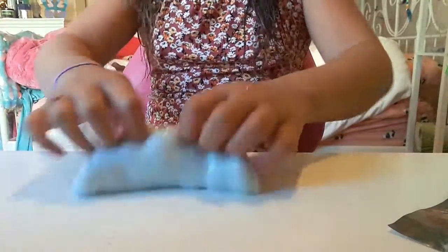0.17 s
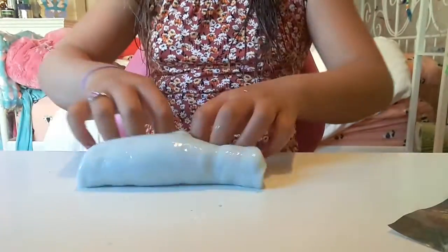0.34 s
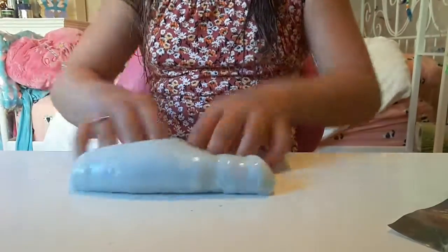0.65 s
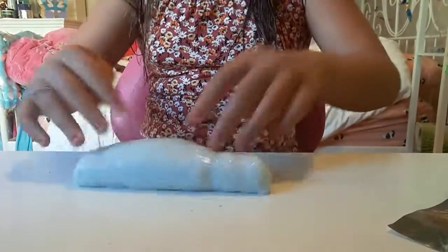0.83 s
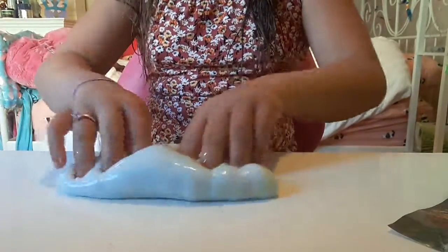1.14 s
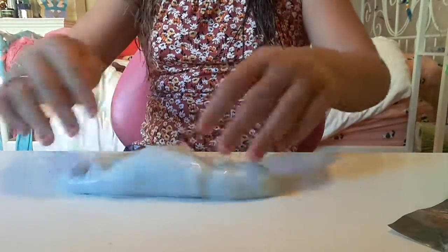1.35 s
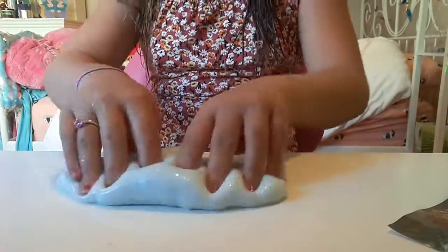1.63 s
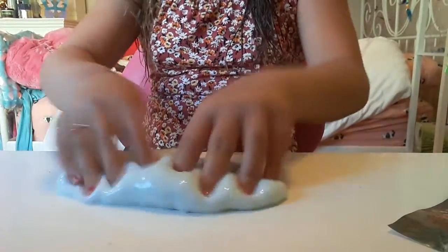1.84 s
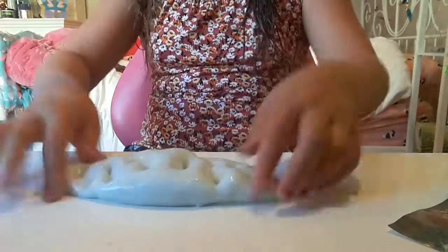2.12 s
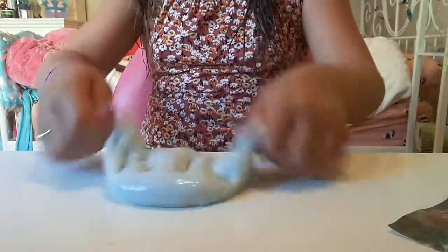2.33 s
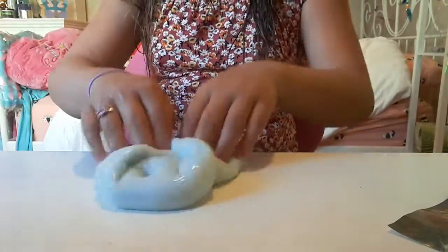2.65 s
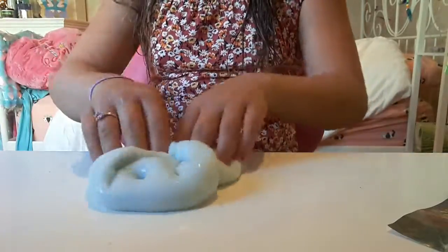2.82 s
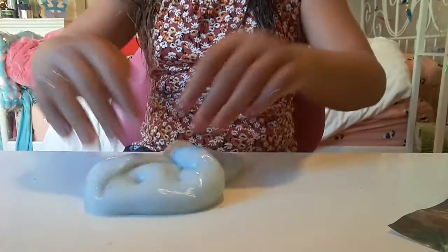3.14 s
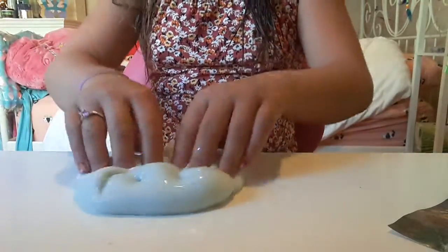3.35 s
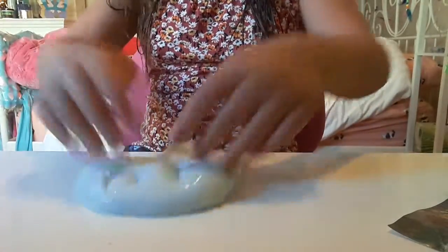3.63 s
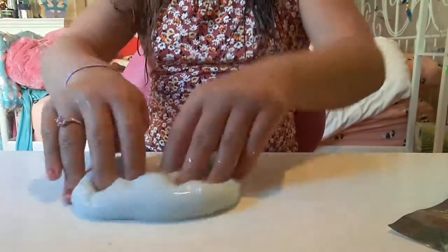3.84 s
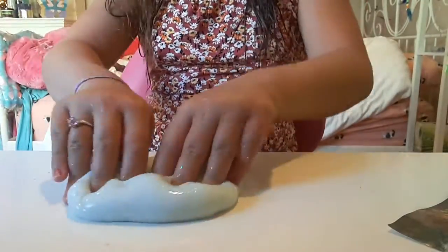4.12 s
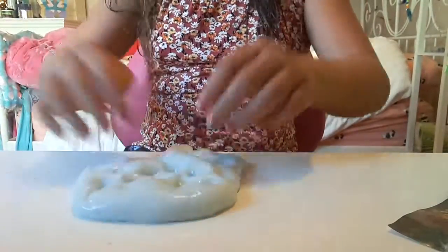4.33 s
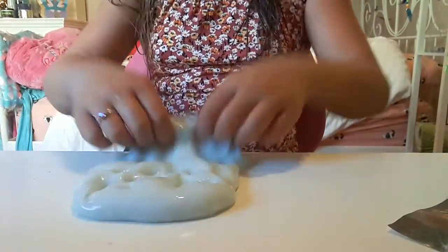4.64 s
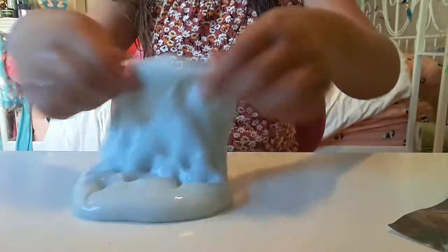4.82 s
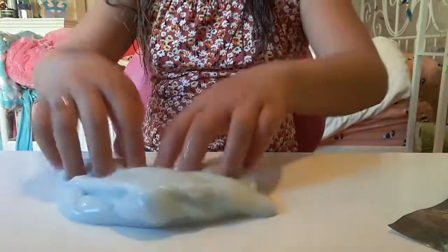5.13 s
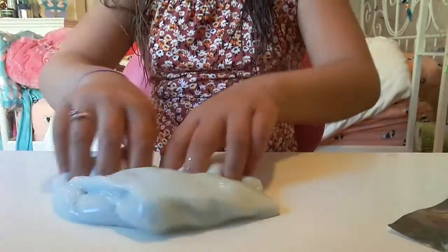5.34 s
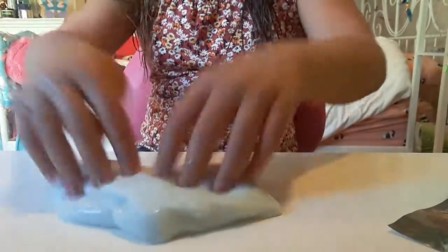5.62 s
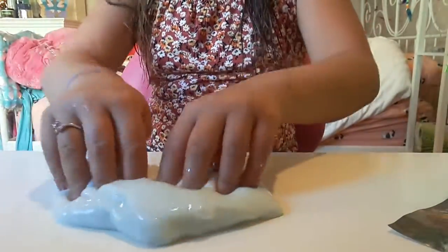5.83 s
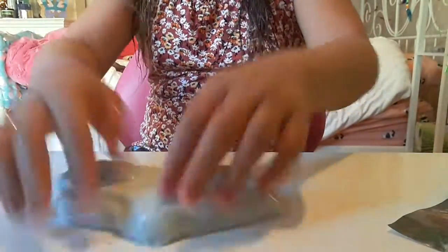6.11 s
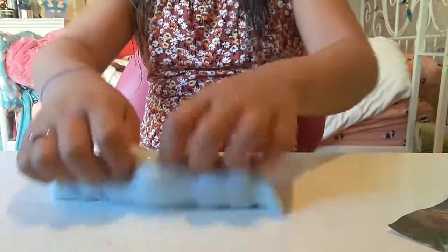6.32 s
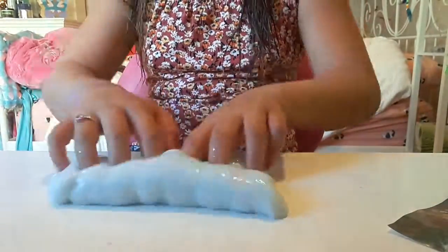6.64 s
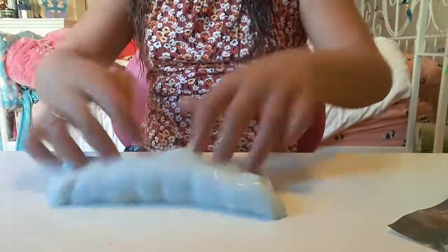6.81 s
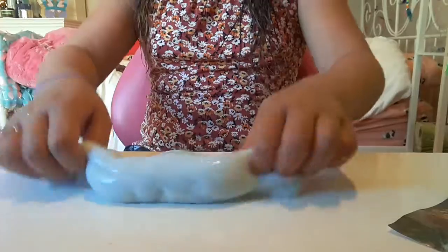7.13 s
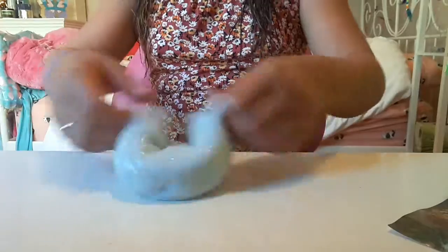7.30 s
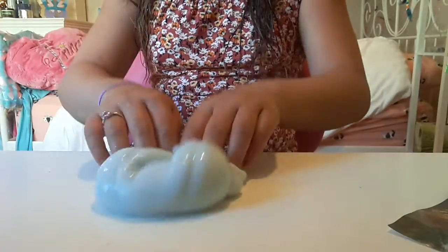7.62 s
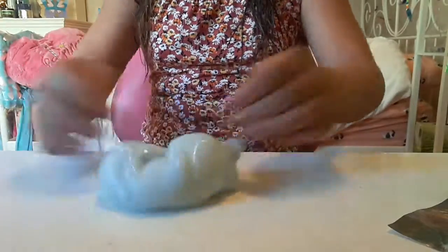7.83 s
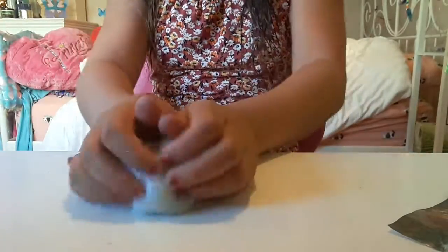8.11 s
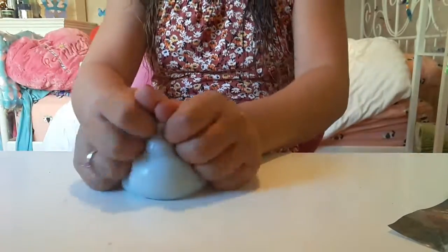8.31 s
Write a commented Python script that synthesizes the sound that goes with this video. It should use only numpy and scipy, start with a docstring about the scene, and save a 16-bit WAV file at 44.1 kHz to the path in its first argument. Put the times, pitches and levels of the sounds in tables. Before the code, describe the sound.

Fingertips poke thick wet slime on a table in quick triple clicks and hollow pops, with squelchy folds and soft thuds in a quiet room.

```python
"""Fingertips poke, fold and squeeze thick wet slime on a table in a small quiet room.
Each poke lands three fingertips: each thuds on the table, pops a trapped air pocket and snaps the wet skin.
Around the pokes the slime crackles, ticks and blips; flat hands press it with soft thuds.
Breaks are noise bursts through colour filters, and cavities are damped gliding sines.
The table top rings on, close reflections and a room tail answer, over a low background noise."""
import sys
import numpy as np
from scipy import signal
from scipy.fft import rfft, irfft, next_fast_len
from scipy.io import wavfile
from scipy.ndimage import uniform_filter1d

SR = 44100
rng = np.random.default_rng(int(sys.argv[2]) if len(sys.argv) > 2 else 0)


def transcribe(signal):
    """Save signal, clipped to [-1, 1], as a 16-bit WAV file at the path in sys.argv[1]."""
    frames = np.atleast_2d(signal).T
    limited = np.clip(frames, -1, 1)
    pcm = np.round(limited * 32767).astype(np.int16)
    wavfile.write(sys.argv[1], SR, pcm)


N = 373086  # length of the scene [samples]
BURST_T = np.arange(3072) / SR  # time axis of every single burst [s]

# Place: background noise of the quiet room: (frequency [Hz], relative level [dB])
QUIET_COLOUR = [(20, -27), (38, -24), (51, 6.5), (75, -6), (115, -3), (230, -5), (410, -9), (700, -19.5),
                (1500, -24.5), (5300, -40), (8000, -22.5), (10500, -44), (16000, -44)]
QUIET_DB = -60.5
# Place: reverberation time of the room: (frequency [Hz], time to fall 60 dB [s])
ROOM_T60 = [(200, 0.68), (1000, 0.37), (8000, 0.38)]
# Place: colour of the room's tail: (frequency [Hz], level [dB])
ROOM_COLOUR = [(200, -12), (600, -10), (6000, -5)]
# Modes of the table top: (frequency [Hz], relative level [dB], time to fall 60 dB [s])
TABLE_MODES = [(105.4, 0, 0.23), (123.6, -0.5, 0.26), (223.3, 4.5, 0.14), (473, -1, 0.17),
               (616.5, 13, 0.092), (666, 10, 0.19)]
# Microphone side: upper band limit of the recorder
RECORDER_EDGE_HZ = 16200

# Hands lean on the table and it sways: (time [s], level [dB])
LEANS = [(3.859, -42.5), (4.41, -47), (4.931, -44.5), (5.47, -49), (5.96, -51), (6.22, -60)]
LEAN_RISE_S, LEAN_DB_PER_S = 0.022, -114

# Colour of the skin's snap: (frequency [Hz], relative level [dB])
SNAP_COLOUR = [(100, -50.5), (1500, -16), (3700, -14.5), (5600, -14), (7000, -5.5), (8100, 2), (9000, -5),
               (11000, -17), (16000, -29.5)]
# Colour of an air pocket's splat: (frequency [Hz], relative level [dB])
POP_COLOUR = [(100, -36.5), (400, 2.5), (650, -0.5), (1800, -1), (2200, -13), (2800, -11.5), (3700, -27.5),
              (8000, -22), (16000, -57.5)]
# Colour of a cushioned landing: (frequency [Hz], relative level [dB])
THUD_COLOUR = [(25, -24.5), (70, -15), (115, 1), (230, 3.5), (320, -7), (500, -9), (1000, -30), (5000, -50)]
# Colour of a small bubble's tear: (frequency [Hz], relative level [dB])
TEAR_COLOUR = [(80, -10.5), (400, 11), (2600, -1), (3800, -6.5), (6000, -7), (8100, 7.5), (11000, -16),
               (16000, -35)]

# Faint bubbles part at random: lowest level, random range above it, middle pitch
STRAY_DB, STRAY_SPREAD_DB, STRAY_HZ = -68, 11.5, 4020
# Stretches and folds, each a run of crackle that dies down:
# (start [s], length [s], level of a small blip [dB], middle pitch [Hz])
STRETCHES = [(2.246, 0.12, -48, 2200), (4.652, 0.093, -54, 5000), (4.967, 0.089, -52.5, 3410),
             (6.24, 0.46, -58.5, 3000), (7.12, .2, -51.5, 6500), (7.523, 0.2, -59, 6500),
             (8.059, 1, -51.5, 2600)]
BLIPS_PER_S, STRETCH_FADE_DB, BLIP_SPREAD_DB, BLIP_OCTAVES = 110, -9, 5, 0.95
# The loudest small bubbles and threads parting: (time [s], level [dB], pitch [Hz])
TICKS = [(0.2224, -49, 9650), (0.611, -48, 1860), (0.6304, -39, 8350), (0.9991, -36.5, 1460),
         (2.374, -41, 8270), (2.475, -50.5, 5000), (2.496, -47.5, 3180), (2.808, -49, 7000),
         (4.6977, -46, 7300), (4.9796, -41.5, 4770), (5.702, -37.5, 9440), (6.339, -40.5, 4900),
         (6.485, -43.5, 1870), (7.1915, -36.5, 7480), (7.239, -39, 8400), (7.262, -48, 7000),
         (7.3189, -42.5, 5400), (7.401, -27, 6070), (7.602, -42, 8400), (7.6316, -37, 6760),
         (8.1099, -30.5, 2250), (8.136, -34, 1940), (8.179, -39, 2800), (8.3662, -31, 8000),
         (8.395, -30, 2690)]
# Bubbles squeezed out, from hollow blobs to very short high clicks:
# (time [s], level [dB], middle pitch [Hz], decay [s])
SQUEEZED = [(0.0512, -36, 7740, 0.00095), (2.0901, -24.5, 699, 0.0045), (2.5475, -36.5, 7760, 0.0014),
            (7.398, -34, 1605, 0.0013), (7.4026, -18, 7800, 0.00042), (7.862, -22, 1375, 0.0036),
            (8.212, -20, 2580, 0.00037), (8.212, -23, 4270, 0.00051)]
# Further air pockets that burst during pokes, presses and folds:
# (time [s], level [dB], cavity pitch [Hz])
POCKETS = [(0.337, -53.5, 1510), (0.412, -52.5, 1700), (1.971, -23.5, 795), (2.033, -32, 726),
           (2.272, -37, 664), (4.959, -35, 900), (4.985, -41, 1080), (7.398, -34.5, 1300),
           (8.264, -37, 624), (8.34, -34, 553)]
# Hands pressing or folding the slime onto the table:
# (time [s], thud level before gain [dB], thud pitch [Hz], wet tick level [dB])
PRESSES = [(0.307, -46.5, 240, -70), (0.41, -46, 247, -58), (2.2, -38, 155, -42.5),
           (2.271, -33.5, 236, -32), (4.53, -43, 143, -56), (4.955, -38, 214, -58),
           (6.236, -31.5, 118, -37), (6.255, -30.5, 125, -39.5), (6.645, -30.5, 148, -51),
           (7.115, -35.5, 139, -46.5), (7.161, -35.5, 171, -36.5), (7.566, -39, 158, -39),
           (8.042, -23.5, 168, -34), (8.341, -31, 222, -28.5)]
PRESS_TICK_HZ = 7200

# Pokes of three fingertips; snap and pop grow or shrink by a step from one to the next:
# (time [s], delay of the second [s], delay of the third [s], base snap level [dB], snap step [dB],
#  base pop level [dB], pop step [dB], base cavity pitch [Hz], base thud level [dB], base thud pitch [Hz])
POKES = [(0.7787, .0175, 0.032, -31, -2.5, -29, -3.5, 860, -30, 237),
         (1.3403, .017, .028, -29.5, -0.5, -25, 6, 695, -25, 154),
         (1.9425, 0.013, 0.042, -26, -1.5, -24.5, 8.5, 1100, -27.5, 225),
         (3.0596, 0.013, 0.031, -33, 11, -28, 6, 826, -27.5, 170),
         (3.674, 0.026, 0.061, -27.5, -1, -28.5, -2, 1500, -33.5, 205),
         (4.262, .015, 0.033, -32.5, 9.5, -23.5, 4.5, 960, -27, 282),
         (5.502, 0.03, .0415, -28, 1, -27, 1, 1030, -33.5, 187),
         (6.0246, .024, 0.035, -29.5, 5, -28.5, 10.5, 678, -29, 218),
         (6.8712, 0.016, 0.03, -30, 4.5, -28, -0.5, 820, -32, 215),
         (7.8377, 0.022, .042, -33.5, -10, -31, 11.5, 1150, -28.5, 210)]
# What the first, second and third fingertip add to any poke:
# (snap [dB], snap body [dB], pop [dB], thud [dB], cavity pitch [ratio], thud pitch [ratio])
FINGERS = [(3.5, -4, 0.5, 0, 0.58, 1.08), (5, 6, 0.5, -3.5, 1.3, .97), (-2.5, 7, -3, -3.5, 1.25, .92)]
# A fingertip touches the surface softly just before it breaks through; level relative to the first pop
TOUCH_LEAD_S, TOUCH_DB, TOUCH_HZ = 0.0039, -18.5, 520
# Smaller pockets burst around the sinking fingers; levels relative to the poke's base levels
SPATTER_S, SPATTER_SNAP_DB, SPATTER_POP_DB = 0.045, -11.5, -10.5
SPATTER_HZ, SPATTER_OCTAVES = 705, 0.74


def amp(db):
    """Decibels to gain."""
    return 10 ** (np.asarray(db) / 20)


def read(points, hz):
    """A spectrum table read on a log-frequency axis."""
    f, value = np.transpose(points)
    return np.interp(np.log(hz + 1), np.log(f + 1), value)


def unit(x):
    """Scales a sound to energy one."""
    return x / np.sqrt(np.sum(x ** 2) + 1e-20)


def peaked(x, size):
    """Scales a sound so that its loudest stretch of size samples has rms one."""
    return x / np.sqrt(uniform_filter1d(x ** 2, size, mode="constant").max())


def add(mix, s, sound):
    """Mixes a sound in at time s, in seconds."""
    part = mix[max(round(s * SR), 0):][:len(sound)]
    part += sound[:len(part)]


def coloured(x, colour, hz=1000, focus_db=0, octaves=1, body_db=0):
    """Causal filter: a colour, a resonance at hz, and more or less body below the treble."""
    f = abs(np.fft.fftfreq(len(BURST_T), 1 / SR)) + 1
    focus = focus_db / (1 + (np.log2(f / hz) / octaves) ** 2)
    body = body_db / (1 + (f / 5000) ** 5)
    log_gain = np.log(amp(read(colour, f) + focus + body))
    # minimum phase: the energy comes as early as the colour allows
    kernel = np.fft.ifft(np.exp(np.conj(signal.hilbert(log_gain)))).real
    return signal.fftconvolve(x, kernel)[:len(x)]


def noise(colour):
    """Steady noise of rms one."""
    size = next_fast_len(N)
    gain = amp(read(colour, np.fft.rfftfreq(size, 1 / SR)))
    x = irfft(rfft(rng.standard_normal(size)) * gain, size)
    return unit(x[:N]) * np.sqrt(N)


def background():
    """The steady noise of the quiet room."""
    return amp(QUIET_DB) * noise(QUIET_COLOUR)


def echoes(wet_db, near_db, near_decay=0.005):
    """Close reflections from table and hands, then the short tail of the room."""
    t = np.arange(SR // 2) / SR
    sparse = rng.standard_normal(len(t)) * (rng.random(len(t)) < 0.05)
    near = unit(sparse * (t > 0.0015) * np.exp(-t / near_decay))
    taps = rng.standard_normal(len(t)) * (1 - np.exp(-(t / 0.013) ** 2))
    # each frequency band dies at its own rate
    hz, at, bands = signal.stft(taps, SR, nperseg=256)
    bands = bands * amp(-60 * at / read(ROOM_T60, hz)[:, None])
    tail = coloured(unit(signal.istft(bands, SR)[1][:len(t)]), ROOM_COLOUR)
    return amp(wet_db) * tail + amp(near_db) * near


def room(x, wet_db, near_db):
    """Three sets of echoes fade into one another at a steady rate, so the tail stays smooth."""
    angle = 2 * np.pi * 4.3 * np.arange(N) / SR
    out = x.copy()
    for k in range(3):
        share = np.sqrt(2 / 3) * np.cos(angle + np.pi * k / 3)  # the three powers sum to one
        out += signal.oaconvolve(x * share, echoes(wet_db, near_db))[:N]
    return out


def table(x, ring_db=-57):
    """The table top rings on after every blow, as a sum of decaying modes."""
    t = np.arange(SR // 2) / SR
    modes = sum(amp(db - 60 * t / t60) * np.cos(2 * np.pi * hz * t) for hz, db, t60 in TABLE_MODES)
    return x + amp(ring_db) * signal.fftconvolve(x, modes)[:N]


def sway():
    """A low rumble swells and dies each time the hands lean on the table."""
    t, weight = np.arange(N) / SR, np.zeros(N)
    for s, db in LEANS:
        rise = np.clip((t - s) / LEAN_RISE_S, 0, 1)
        weight += rise * amp(db + LEAN_DB_PER_S * np.maximum(t - s - LEAN_RISE_S, 0))
    return weight * noise([(15, -20), (45, 0), (90, -3), (1000, -80)])  # (frequency [Hz], level [dB])


def rupture(decay, spray):
    """One sudden break followed by a dying spray of smaller ones."""
    x = spray * unit(rng.standard_normal(len(BURST_T)) * np.exp(-BURST_T / decay))
    x[0] += 1
    return x


def ring(hz, decay, attack, glide=0):
    """A damped oscillation whose pitch slides around hz as the cavity changes shape."""
    pitch = hz * (1 + glide * (np.tanh(BURST_T / decay) - 0.5))
    turns = np.cumsum(pitch) / SR
    envelope = np.exp(-BURST_T / decay) * (1 - np.exp(-BURST_T / attack))
    return unit(np.sin(2 * np.pi * turns) * envelope)


def tick(db, hz, tone=0.67):
    """A small bubble tears and rings briefly at its own pitch."""
    burst = rupture(decay=0.003, spray=4.6)
    tear = unit(coloured(burst, TEAR_COLOUR, hz, focus_db=8.0, octaves=0.82))
    cavity = ring(hz, decay=4 / hz, attack=0.0003, glide=0.2)
    return amp(db) * peaked(tear + tone * cavity, size=128)


def thud(db, hz, tone=0.37):
    """The slime cushions a landing into a low push with a falling tone."""
    push = unit(coloured(rupture(decay=0.012, spray=2.6), THUD_COLOUR))
    body = ring(hz, decay=0.006, attack=0.023, glide=-0.14)
    return amp(db) * peaked(push + tone * body, size=300)


def pop(db, hz, tone=0.71, decay=0.0079):
    """An air pocket tears open with a splat and its cavity rings for a few cycles."""
    splat = unit(coloured(rupture(decay, spray=2.3), POP_COLOUR, hz, focus_db=3, octaves=1.0))
    cavity = ring(hz, decay=0.0024, attack=0.0008, glide=0.22)
    return amp(db) * peaked(splat + tone * cavity, size=160)


def snap(db, body_db, decay=0.0013):
    """The wet skin breaks with a bright, short crack."""
    crack = coloured(rupture(decay, spray=6.3), SNAP_COLOUR, body_db=body_db)
    return amp(db) * peaked(crack, size=128)


def strays(count=45):
    """Faint bubbles part at random through the whole scene, up to an octave around a middle pitch."""
    out = np.zeros(N)
    for when, size, pitch in rng.random((count, 3)):
        blip = tick(STRAY_DB + STRAY_SPREAD_DB * size, STRAY_HZ * 2 ** (2 * pitch - 1))
        add(out, when * N / SR, blip)
    return out


def crackle(count=200):
    """Fine bubbles part at random while the slime is stretched: many faint blips, a few stronger ones."""
    pitches = np.geomspace(400, 9000, 40)
    blips, out = [tick(0, hz) for hz in pitches], np.zeros(N)
    for start, length, db, middle_hz in STRETCHES:
        gaps, sizes = rng.exponential(1, (2, count))
        pitch = middle_hz * 2 ** (BLIP_OCTAVES * rng.standard_normal(count))
        times = np.cumsum(gaps) / BLIPS_PER_S
        for t, size, hz in zip(times, np.minimum(sizes, 3.5), pitch):
            if t < length:
                gain = amp(db + BLIP_SPREAD_DB * size + STRETCH_FADE_DB * t / length)
                nearest = np.argmin(abs(pitches - hz))
                add(out, start + t, gain * blips[nearest])
    return out


def bubbles():
    """Single small bubbles tick as the slime is handled."""
    out = np.zeros(N)
    for s, db, hz in TICKS:
        add(out, s, tick(db, hz))
    return out


def squeezed(attack=0.00019, glide=0.17):
    """Bubbles squeezed out, from hollow blobs to very short high clicks, each slightly rising in pitch."""
    out = np.zeros(N)
    for s, db, hz, decay in SQUEEZED:
        add(out, s, amp(db) * peaked(ring(hz, decay, attack, glide), size=128))
    return out


def pockets():
    """Further air pockets burst during pokes, presses and folds."""
    out = np.zeros(N)
    for s, db, hz in POCKETS:
        add(out, s, pop(db, hz))
    return out


def presses(thud_gain_db=-1.0):
    """A flat hand gives a thud and only a small wet tick; returns the ticks and the thuds."""
    ticks, thuds = np.zeros((2, N))
    for s, thud_db, hz, tick_db in PRESSES:
        add(ticks, s, tick(tick_db, PRESS_TICK_HZ))
        add(thuds, s, thud(thud_db + thud_gain_db, hz))
    return ticks, thuds


def spatter(count=4):
    """Smaller snaps and pops scattered through each poke; returns the bright and the hollow part."""
    bright, hollow = np.zeros((2, N))
    slot = SPATTER_S / count  # one snap and one pop fall at random inside each slot
    for start, _, _, snap_db, _, pop_db, *_ in POKES:
        for k, (snap_at, pop_at, pitch) in enumerate(rng.random((count, 3))):
            hz = SPATTER_HZ * 2 ** (SPATTER_OCTAVES * (2 * pitch - 1))
            add(bright, start + slot * (k + snap_at), snap(snap_db + SPATTER_SNAP_DB, body_db=-8.5))
            add(hollow, start + slot * (k + pop_at), pop(pop_db + SPATTER_POP_DB, hz))
    return bright, hollow


def pokes(snap_gain_db=1.0, thud_gain_db=-2.0):
    """Every fingertip snaps skin, bursts a pocket and thuds; returns the bright and the hollow part."""
    bright, hollow = np.zeros((2, N))
    for start, second, third, snap_db, snap_step, pop_db, pop_step, hz, thud_db, thud_hz in POKES:
        add(hollow, start - TOUCH_LEAD_S, pop(pop_db - pop_step + TOUCH_DB, TOUCH_HZ))
        for step, delay, finger in zip((-1, 0, 1), (0, second, third), FINGERS):
            more_snap, body_db, more_pop, more_thud, pop_ratio, thud_ratio = finger
            at = start + delay
            add(bright, at, snap(snap_db + step * snap_step + more_snap + snap_gain_db, body_db))
            add(hollow, at, pop(pop_db + step * pop_step + more_pop, hz * pop_ratio))
            add(hollow, at, thud(thud_db + more_thud + thud_gain_db, thud_hz * thud_ratio))
    return bright, hollow


def scene():
    """Slime and table in the room, over its quiet background noise."""
    snaps, blows = np.add(pokes(), spatter())
    ticks, thuds = presses()
    # each kind of sound has its own balance of room tail and close reflections
    small = room(ticks + bubbles() + crackle() + strays(), wet_db=-5, near_db=-8.0)
    blobs_and_clicks = room(squeezed(), wet_db=-9, near_db=-10.5)
    hollow = room(table(blows + thuds + pockets()), wet_db=-4.0, near_db=-9)
    bright = room(snaps, wet_db=0.0, near_db=-3.0)
    return (background() + sway() + small + blobs_and_clicks + hollow + bright)[None]


def record(dry):
    """The band limit of the recorder, a steep low-pass."""
    lowpass = signal.firwin(255, RECORDER_EDGE_HZ, window=("kaiser", 9), fs=SR)
    return signal.oaconvolve(dry, lowpass[None], "same")


dry = scene()
out = record(dry)
transcribe(out)
```